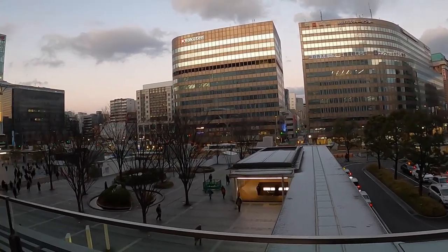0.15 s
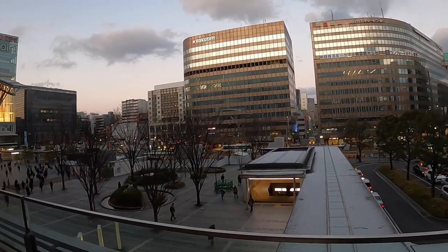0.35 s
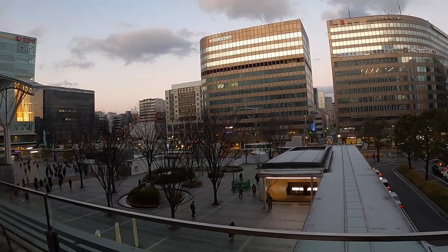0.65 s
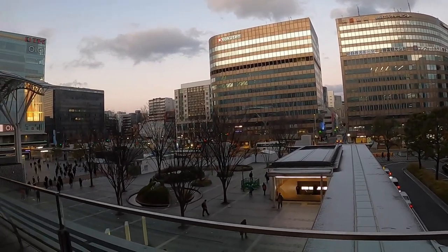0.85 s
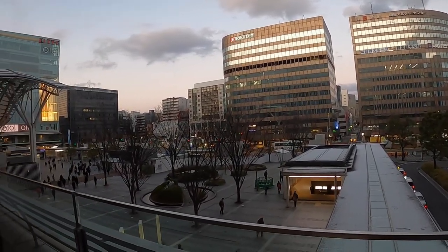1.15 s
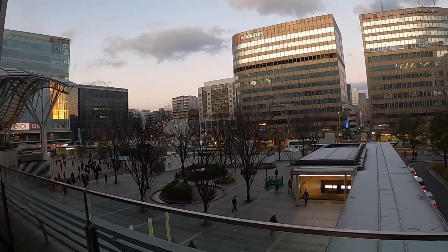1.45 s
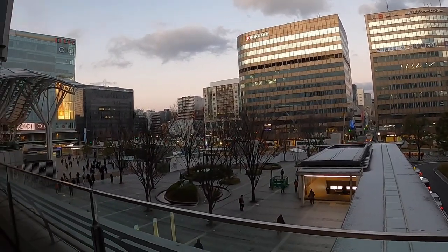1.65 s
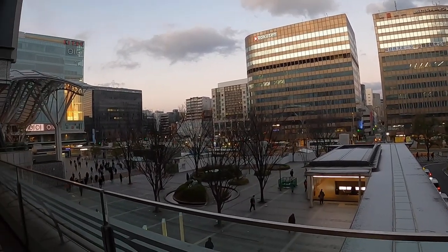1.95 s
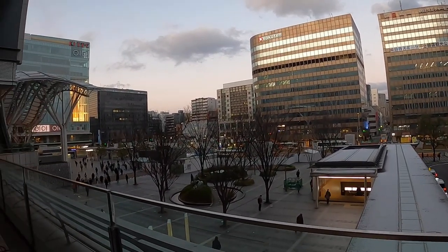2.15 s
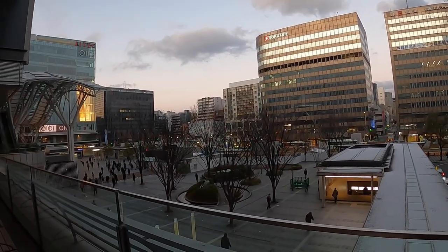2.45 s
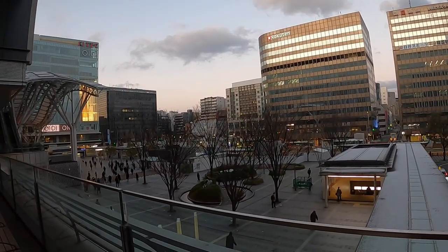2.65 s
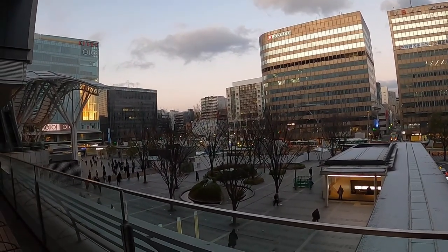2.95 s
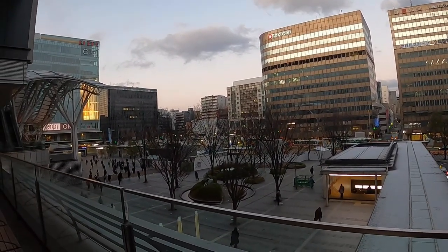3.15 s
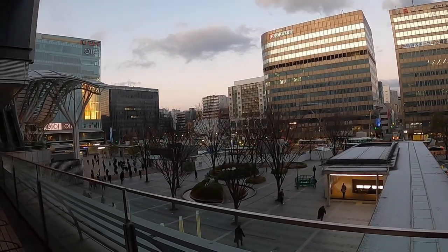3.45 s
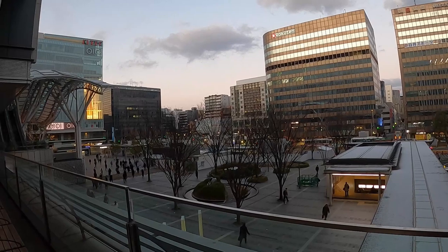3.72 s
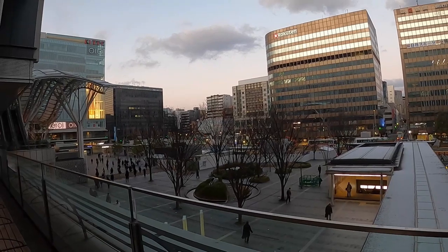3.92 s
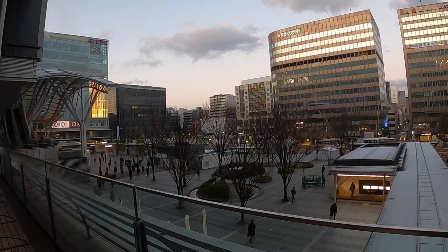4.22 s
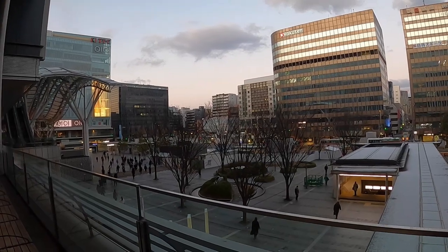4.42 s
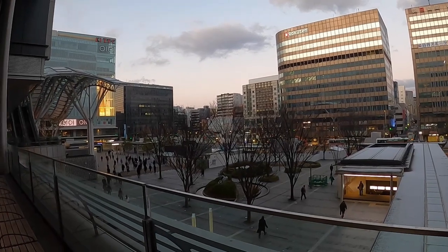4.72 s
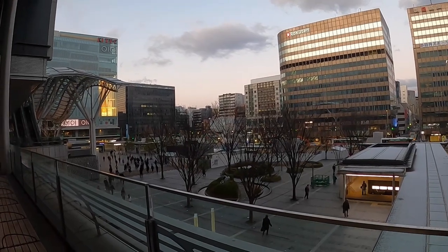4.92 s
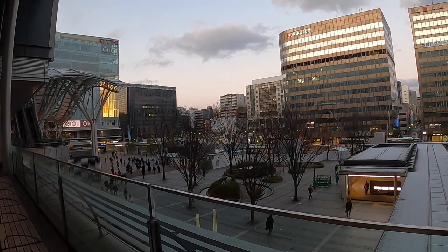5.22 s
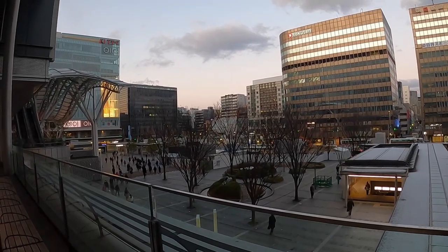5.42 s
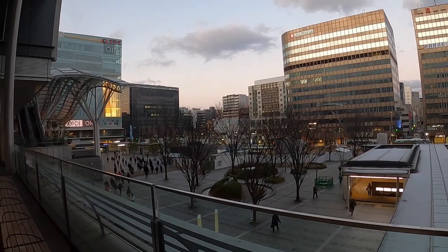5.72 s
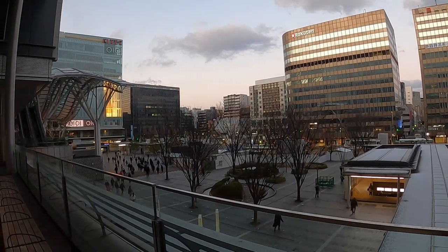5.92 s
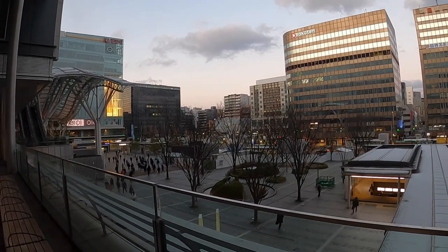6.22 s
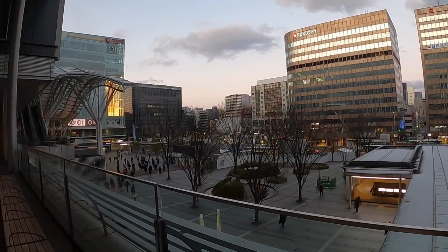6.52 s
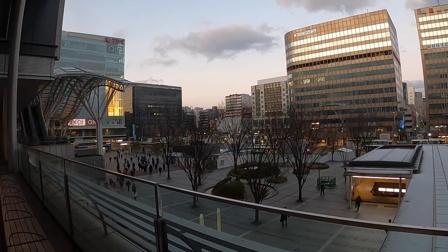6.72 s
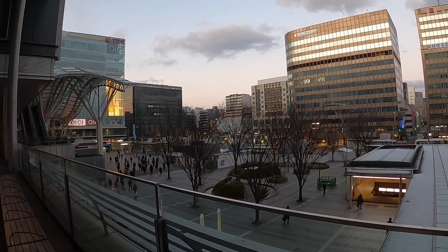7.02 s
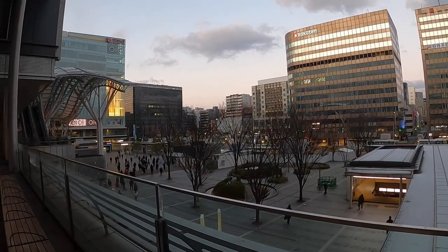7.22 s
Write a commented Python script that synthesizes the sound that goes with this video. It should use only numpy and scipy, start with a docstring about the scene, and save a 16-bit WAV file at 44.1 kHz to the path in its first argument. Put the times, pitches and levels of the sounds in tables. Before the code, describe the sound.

Road traffic drones around a city square while gusts of wind rumble and thump on the microphone.

```python
"""Windy terrace above a city square

Tyres roar and engines drone round a wide square, and the street brightens halfway through.
A diesel throbs, motors hum, air hisses and far brakes sigh. Close up, gusts buffet the
microphone with churning eddies, thumps and a deep heave. After an early gust that catches
the two ports apart, the stereo image narrows to mono."""
import sys
import numpy as np
from scipy import signal
from scipy.fft import rfft, irfft
from scipy.io import wavfile
from scipy.ndimage import uniform_filter1d

SR = 44100
rng = np.random.default_rng(int(sys.argv[2]) if len(sys.argv) > 2 else 0)


def store_pcm(level_fs):
    """Save levels as 16-bit WAV."""
    pcm = np.round(np.clip(level_fs, -1, 1) * 32767).astype(np.int16)
    wavfile.write(sys.argv[1], SR, np.atleast_2d(pcm).T)


N = 325017
FRAME, HOP = 1024, 256
TIME = np.arange(N) / SR
FRAME_S = np.arange(N // HOP + 6)[:, None] * HOP / SR
BIN_HZ = np.fft.rfftfreq(FRAME, 1 / SR)


def gain_of(db):
    """Decibels to amplitude."""
    return 10 ** (np.asarray(db) / 20)


def unit_rms(x):
    """Scales to an rms of one."""
    return x / np.sqrt(np.mean(x ** 2) + 1e-20)


def unit_power(shape):
    """Gives every frame of a spectral shape the same power."""
    return shape / np.sqrt(np.mean(shape ** 2, axis=-1, keepdims=True) + 1e-30)


def curve(rows, at=FRAME_S, column=1):
    """One column of a time table, joined by straight lines."""
    columns = np.transpose(rows)
    return np.interp(at, columns[0], columns[column])


def colour(points):
    """An EQ curve as a gain for each bin."""
    hz, db = np.transpose(points)
    return gain_of(np.interp(np.log(BIN_HZ + 1), np.log(hz), db))


def swell(at, peak_s, rise_s, fall_s):
    """A bell of power that rises to one and falls again."""
    return np.exp(-((at - peak_s) / np.where(at < peak_s, rise_s, fall_s)) ** 2)


def patches(depth_db, frames, bins):
    """Random patches of gain drifting over time and frequency."""
    field = rng.standard_normal((len(FRAME_S), len(BIN_HZ)))
    smooth = uniform_filter1d(uniform_filter1d(field, frames, 0), bins, 1)
    return gain_of(depth_db * unit_rms(smooth))


def flutter(rate_hz):
    """A random wobble of rms one, rolled off above the rate."""
    hz = np.fft.rfftfreq(N, 1 / SR)
    return unit_rms(irfft(rfft(rng.standard_normal(N)) / (1 + (hz / rate_hz) ** 4), N))


def noise(magnitude):
    """Noise that follows a frames x bins magnitude; a magnitude of one gives an rms of one."""
    real, imag = rng.standard_normal((2, len(FRAME_S), len(BIN_HZ)))
    white = real + 1j * imag
    plain, shaped = (signal.istft(z.T, nperseg=FRAME, noverlap=FRAME - HOP)[1][:N]
                     for z in (white, white * magnitude))
    return shaped / plain.std()


def stereo(mid, side):
    """Left and right from mid and side."""
    return np.array([mid + side, mid - side])


def whine(pitch_hz=5925, waver_hz=9, level_db=-86.5):
    """A faint, wavering high whine of machinery."""
    hz = pitch_hz + waver_hz * flutter(rate_hz=25)
    return gain_of(level_db) * np.sqrt(2) * np.sin(2 * np.pi * np.cumsum(hz) / SR)


# Tone of the hiss. Each row: frequency in Hz, relative level in dB.
HISS_EQ = [(1500, -26), (3000, 8), (3900, 4.5), (5500, -1), (7200, -7), (9500, -8.5), (12000, -15),
           (15000, -17)]
# Swells of hiss. Each row: peak, rise and fall in seconds, level in dB, upper edge in Hz.
HISS_SWELLS = [(.27, 0.045, 0.12, -72, 12800), (1.15, .3, 0.2, -78, 12600), (2.27, 0.068, .09, -72, 11500),
               (2.94, .04, .09, -69, 11000), (3.28, .03, .04, -71, 13400), (3.6, .15, .15, -75, 11500),
               (3.745, .04, .1, -65.5, 11500), (3.93, 0.09, 0.22, -59.8, 14000),
               (4.185, 0.04, .16, -63.5, 13200), (4.6, .3, 0.7, -63, 11610),
               (5.67, 0.11, 0.067, -63.5, 9700), (6.87, .2, 0.3, -68, 11200)]


def hiss(floor_db=-74, floor_edge_hz=10000):
    """Spectrum of escaping air: thin swells over a steady floor, flickering in broad patches."""
    def band(edge_hz):
        return unit_power(colour(HISS_EQ) / np.sqrt(1 + (BIN_HZ / edge_hz) ** 26))
    power = (gain_of(floor_db) * band(floor_edge_hz)) ** 2
    for s, rise, fall, db, edge_hz in HISS_SWELLS:
        power = power + (gain_of(db) * band(edge_hz)) ** 2 * swell(FRAME_S, s, rise, fall)
    return np.sqrt(power) * patches(depth_db=1.4, frames=3, bins=160)


# Far brakes. Each row: start and length in seconds, centre and width in Hz, level in dB.
BRAKE_SIGHS = [(0.15, 0.34, 4380, 560, -60.5), (0.38, 0.29, 4300, 600, -65), (.08, 0.51, 3100, 480, -64),
               (.48, .14, 2800, 500, -60), (.96, .046, 3680, 270, -57.5), (.7, 0.92, 5300, 1400, -74),
               (1.318, .05, 7400, 110, -77), (3.1, .12, 6460, 800, -78), (5.15, 0.42, 9650, 600, -78),
               (6.63, 0.18, 4400, 1400, -66)]


def brakes():
    """Spectrum of air brakes and squeaks: each is a narrow band that swells and dies."""
    power = 0
    for s, length, hz, width, db in BRAKE_SIGHS:
        arch = np.sin(np.pi * np.clip((FRAME_S - s) / length, 0, 1))
        band = unit_power(np.exp(-((BIN_HZ - hz) / width) ** 2 / 2))
        power = power + (gain_of(db) * arch * band) ** 2
    return np.sqrt(power)


# Brief tones in the traffic. Each row: peak and half length in seconds, pitch in Hz, level in dB.
MOTOR_HUMS = [(.95, 0.17, 942, -54), (1.53, 0.088, 1009, -50.5), (2.284, 0.053, 226.2, -40.5),
              (2.56, 0.067, 518, -47), (4.85, .22, 2047, -58.5), (4.88, 0.043, 2622, -62),
              (6.8, .25, 677, -54), (7.03, .17, 1098, -48), (7.3, 0.025, 171, -29.5)]


def hums(waver_hz=7):
    """Unsteady notes of motors and tyres swell out of the rumble."""
    drift = np.cumsum(waver_hz * flutter(rate_hz=33)) / SR
    out = np.zeros(N)
    for s, length, hz, db in MOTOR_HUMS:
        envelope = gain_of(db) * np.sqrt(2 * swell(TIME, s, length, length))
        out += envelope * np.sin(2 * np.pi * (hz * TIME + drift))
    return out


# Fader of the engine drone. Each row: time in seconds, level in dB.
DRONE_LEVELS = [(0, -34.5), (1, -36.5), (5.2, -35), (6.2, -42), (6.55, -36.5), (6.85, -33), (7.37, -30.5)]
# Its tone. Each row: frequency in Hz, relative level in dB.
DRONE_EQ = [(15, -15.5), (30, 0), (52, -3), (80, -2.5), (110, -3.5), (150, -9), (180, -9.5), (220, -2.5),
            (258, -9.5), (295, -7), (370, -12), (500, -17.5), (800, -20.5), (2000, -74.5), (6000, -115)]


def engines():
    """Spectrum of buses and lorries, blurred into one low drone."""
    drone = gain_of(curve(DRONE_LEVELS)) * unit_power(colour(DRONE_EQ))
    return drone * patches(depth_db=2.5, frames=50, bins=1)


# Passing vehicles. Each row: nearest moment and distance over speed in seconds, roar and song in dB.
VEHICLES = [(.2, 0.29, -42, -43.5), (1.15, 0.73, -40, -46.5), (2.7, 0.52, -44, -60.5),
            (3.5, 0.51, -40, -58), (4.38, 0.25, -36.5, -44), (4.75, 0.25, -42, -49.5),
            (5.72, 0.11, -41, -57.5), (6.92, 0.38, -35.5, -51)]
# Tone of the tyre roar. Each row: frequency in Hz, relative level in dB.
ROAR_EQ = [(100, -7), (300, 1), (520, -3.5), (700, 0), (860, -0.5), (1020, -1.5), (1300, -5.5), (2000, -15),
           (3000, -24.5), (4500, -34.5), (7000, -44.5), (9500, -52.5), (11500, -64), (14000, -80)]


def tyres(far_roar_db=-53, far_song_db=-52.5, tread_hz=990, tread_width_hz=135, falloff=1.376):
    """Spectrum of tyre roar and tread song: each vehicle nears and recedes over the far traffic."""
    roar_power, song_power = gain_of(far_roar_db) ** 2, gain_of(far_song_db) ** 2
    for s, pass_s, roar_db, song_db in VEHICLES:
        nearness = (1 + ((FRAME_S - s) / pass_s) ** 2) ** -falloff
        roar_power = roar_power + nearness * gain_of(roar_db) ** 2
        song_power = song_power + nearness * gain_of(song_db) ** 2
    roar = unit_power(colour(ROAR_EQ)) * patches(depth_db=1.24, frames=22, bins=5)
    tread_band = np.exp(-((BIN_HZ - tread_hz) / tread_width_hz) ** 4 / 2)
    song = unit_power(tread_band * patches(depth_db=4.5, frames=45, bins=1))
    return np.sqrt(roar_power * roar ** 2 + song_power * song ** 2)


# Fader of the nearer lanes. Each row: time in seconds, level in dB.
LANE_LEVELS = [(0, -49.5), (.6, -51.5), (1.3, -56), (2.2, -52.5), (2.9, -64), (4.11, -80), (4.2, -54),
               (5.1, -46), (6.4, -46.5), (7, -54), (7.37, -45.5)]
# Their tone. Each row: frequency in Hz, relative level in dB.
LANE_EQ = [(400, -26.5), (900, 2.5), (1350, 3.5), (1950, 0), (2600, -6.5), (3600, -14.5), (5000, -22.5),
           (7000, -30.5), (9500, -40.5), (11500, -57.5), (14000, -77.5)]


def near_lanes():
    """Spectrum of the nearer traffic, a brighter wash."""
    wash = gain_of(curve(LANE_LEVELS)) * unit_power(colour(LANE_EQ))
    return wash * patches(depth_db=1.0, frames=16, bins=10)


# Revs of a heavy diesel. Each row: peak and half length in seconds, level in dB, firing rate in Hz.
DIESEL_REVS = [(0.348, 0.071, -23.5, 54.2), (0.796, 0.036, -22.5, 50.7), (1.28, 0.06, -30, 53.5),
               (4.991, .08, -26, 53.73), (7.05, 0.11, -32, 52.5)]


def diesel(idle_hz=50.1, idle_db=-36.5, fade_db_per_s=2, waver_hz=1.537, uneven_db=-2, overtone_db=-12):
    """Firing pulses, softened by distance to two harmonics; a rev makes them louder and faster."""
    power = gain_of(idle_db - fade_db_per_s * TIME) ** 2
    weighted_hz = power * idle_hz
    for s, length, db, hz in DIESEL_REVS:
        rev = gain_of(db) ** 2 * swell(TIME, s, length, length)
        power, weighted_hz = power + rev, weighted_hz + rev * hz
    firing_hz = weighted_hz / power + waver_hz * flutter(rate_hz=5.8)
    phase = 2 * np.pi * np.cumsum(firing_hz) / SR
    level = np.sqrt(power) * gain_of(uneven_db * flutter(rate_hz=21))
    return np.sqrt(2) * level * (np.sin(phase) + gain_of(overtone_db) * np.sin(2 * phase))


# Opening width of the street, widest in the treble. Each row: frequency in Hz, side over mid in dB.
STREET_WIDTH = [(60, -8.5), (150, -29), (320, -20.5), (500, -16.5), (1100, -10.5), (2600, -6.5), (5000, -1),
                (9000, 0)]


def street(narrow_from_s=1.52, narrow_db_per_s=49):
    """A bed of traffic noise that closes down to mono, with the diesel and the whine in the centre."""
    bed = np.sqrt(tyres() ** 2 + engines() ** 2 + near_lanes() ** 2 + hiss() ** 2 + brakes() ** 2)
    mid = noise(bed) + diesel() + whine()
    width = gain_of(-narrow_db_per_s * np.maximum(TIME - narrow_from_s, 0))
    return stereo(mid, width * noise(bed * colour(STREET_WIDTH)))


# The breeze between gusts. Each row: time in seconds, strength in dB, eddies' upper corner in Hz.
BREEZE_CURVE = [(0, -32.5, 76.4), (1, -33.5, 92), (1.8, -33, 98), (2, -37.5, 130), (2.1, -34, 100),
                (2.65, -32.5, 100), (3, -43, 190), (3.45, -39, 300), (4.02, -36, 200), (4.7, -27, 114),
                (5.27, -29.5, 104), (5.4, -26.5, 150), (5.9, -28, 120), (6.6, -39, 106), (7, -29.5, 131),
                (7.37, -34.5, 150)]
# Gusts. Each row: peak and rise in seconds, strength in dB, eddies' upper corner in Hz.
WIND_GUSTS = [(0.308, 0.062, -31, 70), (1.282, 0.035, -23.5, 150), (1.452, 0.04, -25, 127),
              (1.654, 0.011, -31, 90), (2.259, 0.021, -23.5, 110), (2.706, 0.031, -25.5, 150),
              (2.794, 0.014, -25.5, 95), (2.91, 0.026, -29, 95), (3.186, 0.1, -31, 171),
              (3.772, 0.036, -26.5, 160), (3.913, 0.057, -31, 211), (4.163, 0.032, -22.5, 135),
              (4.254, 0.041, -18.5, 366), (4.318, 0.028, -21.5, 320), (4.388, 0.025, -19, 324),
              (4.464, 0.018, -19.5, 290), (4.534, 0.032, -20, 370), (4.593, 0.028, -22.5, 220),
              (4.77, 0.13, -28.5, 165), (4.923, 0.03, -28, 350), (5.019, 0.055, -20, 226),
              (5.132, 0.029, -24.5, 90), (5.37, 0.015, -24, 170), (5.419, 0.008, -22, 260),
              (5.484, 0.035, -23, 492), (5.589, 0.042, -20.5, 300), (5.704, 0.022, -17, 228),
              (5.73, 0.014, -21.5, 630), (5.78, 0.017, -20.5, 483), (5.842, 0.033, -25.5, 435),
              (6.007, 0.022, -24.5, 290), (6.088, 0.019, -28.5, 250), (6.137, 0.068, -31.5, 65),
              (6.388, 0.047, -28.5, 153), (7.312, 0.034, -28, 255)]


def airflow(at, fall_over_rise=1.08):
    """Wind strength and corner in Hz: gusts add to the breeze, and their corners blend, weighted by power, to
    size the eddies."""
    power = gain_of(curve(BREEZE_CURVE, at)) ** 2
    weighted_hz = power * curve(BREEZE_CURVE, at, column=2)
    for s, rise, db, hz in WIND_GUSTS:
        gust = gain_of(db) ** 2 * swell(at, s, rise, rise * fall_over_rise)
        power, weighted_hz = power + gust, weighted_hz + gust * hz
    return np.sqrt(power), weighted_hz / power


# Deep surges of air. Each row: peak and half length in seconds, level in dB.
AIR_SURGES = [(0.256, 0.057, -31), (4.23, 0.037, -34), (4.458, 0.045, -26), (5.108, 0.1, -24),
              (6.153, 0.029, -28.5)]


def heave(strength, relative_db=-19, band_hz=(20, 42)):
    """The largest, slowest eddies push deep under each gust, and a few of them surge."""
    band = signal.butter(2, band_hz, "bandpass", fs=SR, output="sos")
    surges = sum(gain_of(db) ** 2 * swell(TIME, s, length, length) for s, length, db in AIR_SURGES)
    power = (gain_of(relative_db) * strength) ** 2 + surges
    return np.sqrt(power) * unit_rms(signal.sosfilt(band, rng.standard_normal(N)))


# Single eddies hitting the ports. Each row: time and width in seconds, left and right amplitude.
EDDY_HITS = [(1.177, 0.0032, 0, .14), (1.2714, 0.0017, 0, -.22), (1.384, 0.0018, 0, -.22),
             (1.437, 0.0044, 0, -.18), (1.549, 0.0012, -.03, -.18), (4.402, 0.0016, .17, .17),
             (4.448, 0.0007, .22, .22), (4.506, 0.00079, -.18, -.18), (5.473, 0.00067, .19, .19),
             (5.715, 0.00072, -.22, -.22), (5.7609, 0.00079, -.3, -.3), (5.81, 0.00088, .18, .18)]


def thumps():
    """A large eddy is one push of pressure between two shallow rebounds."""
    out = np.zeros((2, N))
    for s, width, left, right in EDDY_HITS:
        offset_squared = ((TIME - s) / width) ** 2
        out += np.outer([left, right], (1 - offset_squared) * np.exp(-offset_squared / 2))
    return out


def eddies(lumpy_db=1.2, low_cut_hz=24, knee_hz=55, steepness=4.37, shed_ratio=0.51, shed_db=2.0):
    """Turbulent pressure at a port: faster air sheds smaller eddies, and they arrive in lumps."""
    _, corner_hz = airflow(FRAME_S)
    ratio = BIN_HZ / corner_hz
    slope = 1 / np.sqrt((1 + BIN_HZ / knee_hz) * (1 + ratio ** steepness))
    # vortices shed by the housing crowd round one pitch, which rises with the wind speed
    vortices = gain_of(shed_db * np.exp(-(2 * (ratio / shed_ratio - 1)) ** 2))
    churn = noise(unit_power(slope * vortices)) * gain_of(lumpy_db * flutter(rate_hz=44))
    churn = signal.sosfilt(signal.butter(2, low_cut_hz, "highpass", fs=SR, output="sos"), churn)
    # keep the quick lumps and level out the slow swings
    return churn / np.sqrt(uniform_filter1d(churn ** 2, size=2600) + 1e-12)


# Stereo width of the wind. Each row: time in seconds, side gain in dB.
WIND_WIDTH = [(0, -32), (.95, -17.5), (1.15, -7), (1.3, -3), (1.54, -2.5), (1.65, -16), (2.35, -37),
              (2.5, -76)]


def wind(strength, trim_db=1.11, lean_right=0.3):
    """Gusts shake both microphone ports alike, save one that catches them apart, the right harder."""
    mid = eddies()
    side = gain_of(curve(WIND_WIDTH, TIME)) * (eddies() - lean_right * mid)
    return strength * gain_of(trim_db) * stereo(mid, side)


def scene():
    """The street with the wind over it."""
    frame_strength, _ = airflow(FRAME_S[:, 0])
    strength = np.interp(TIME, FRAME_S[:, 0], frame_strength)
    return street() + wind(strength) + heave(strength) + thumps() + hums()


def record(dry, ceiling=0.57, high_cut_hz=15000):
    """Soft clipping rounds the strongest buffets; then tiny fades at the ends and a high cut."""
    rounded = ceiling * np.tanh(dry / ceiling)
    faded = rounded * signal.windows.tukey(N, 400 / N)
    high_cut = signal.firwin(511, high_cut_hz, window=("kaiser", 9), fs=SR)
    return signal.oaconvolve(faded, high_cut[None], "same")


dry = scene()
out = record(dry)
store_pcm(out)
```